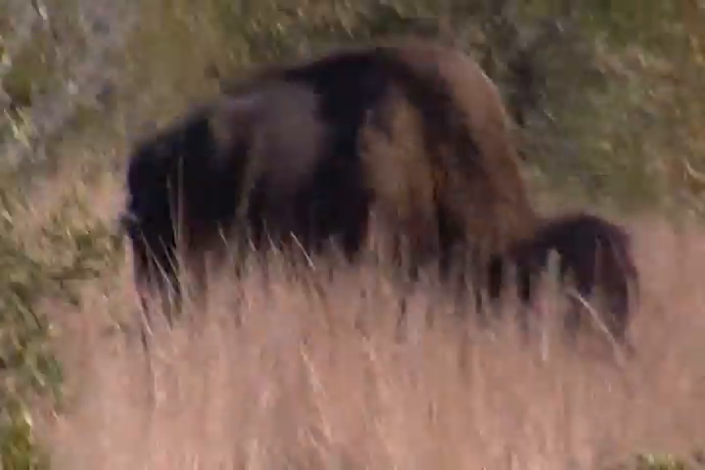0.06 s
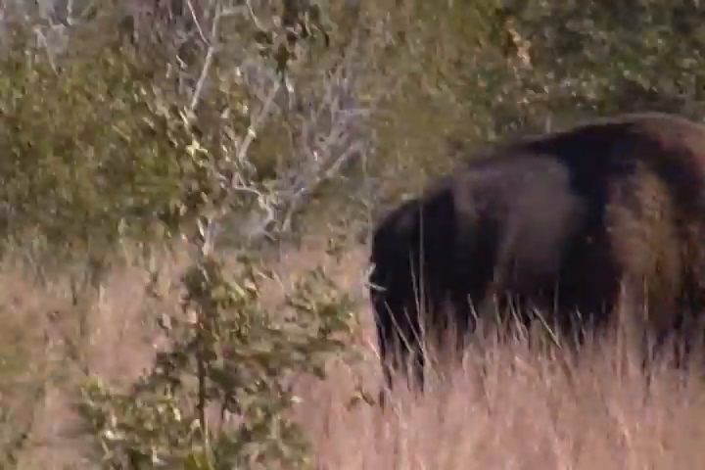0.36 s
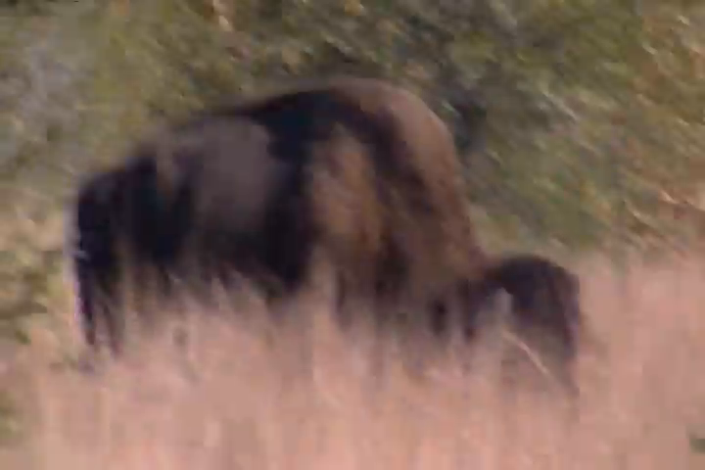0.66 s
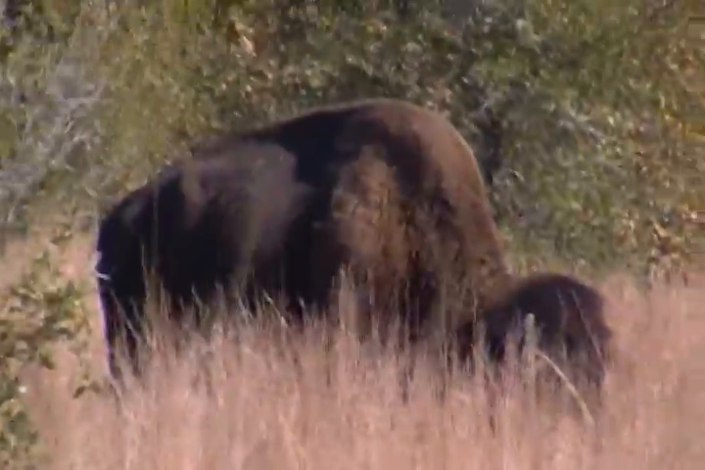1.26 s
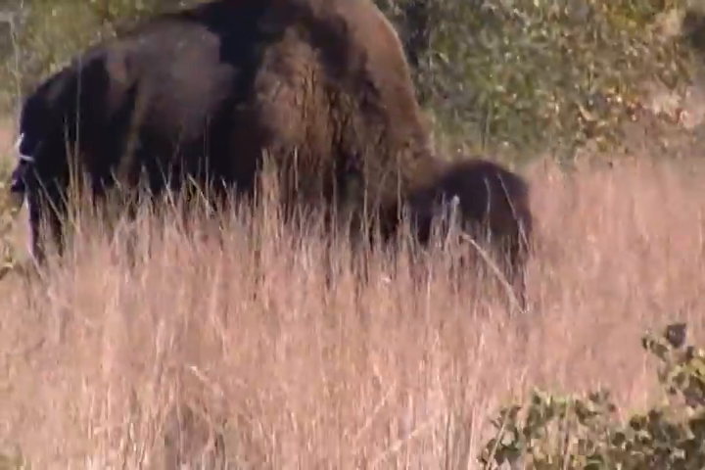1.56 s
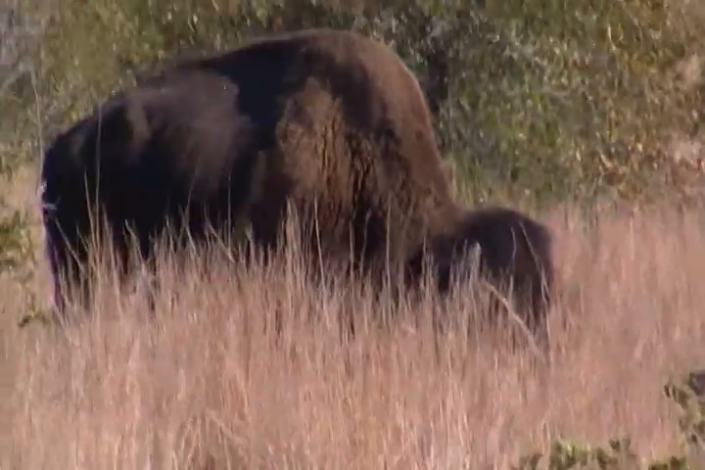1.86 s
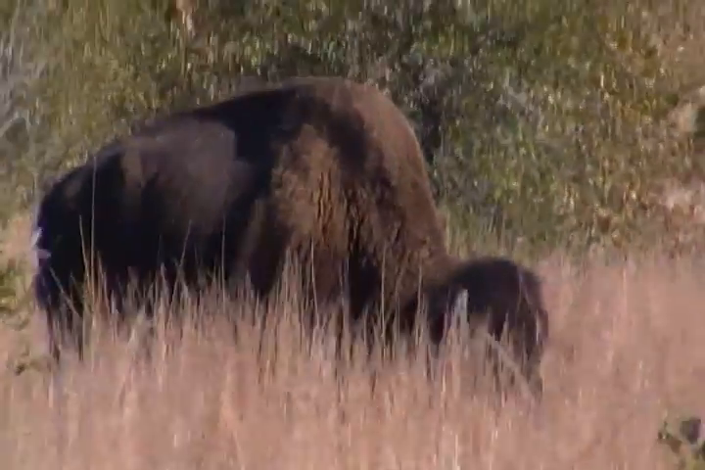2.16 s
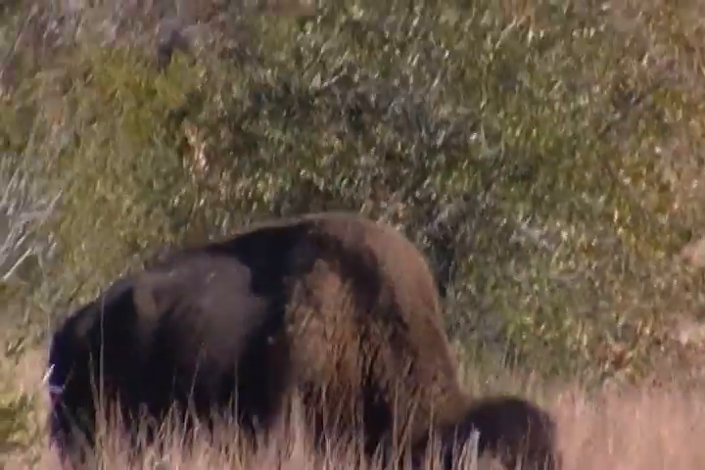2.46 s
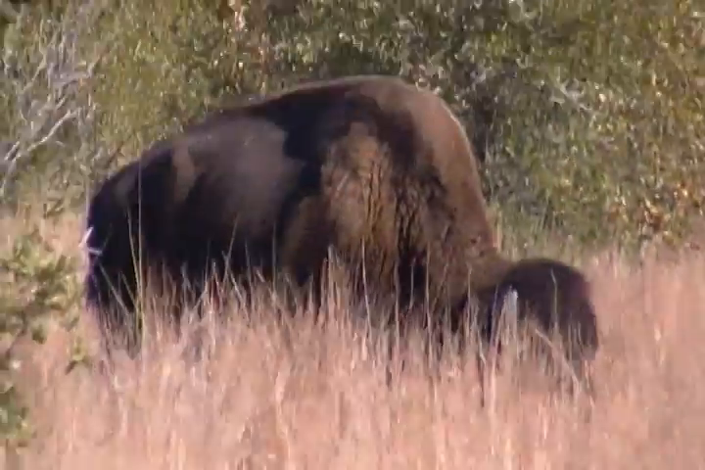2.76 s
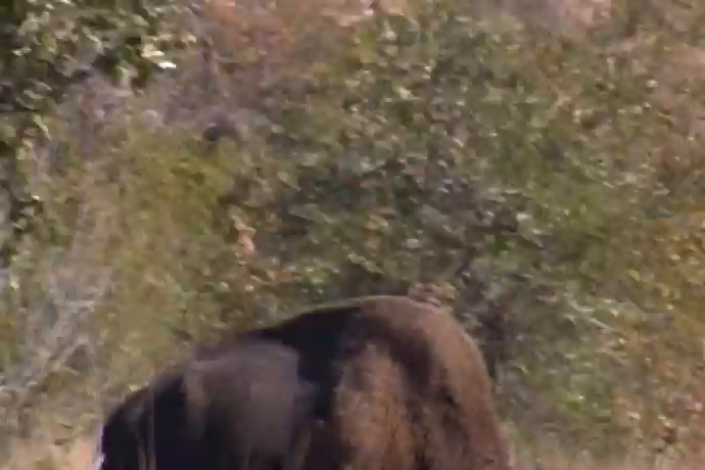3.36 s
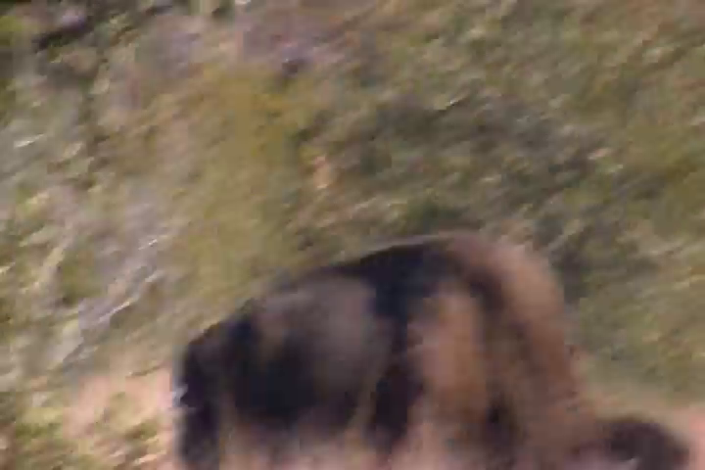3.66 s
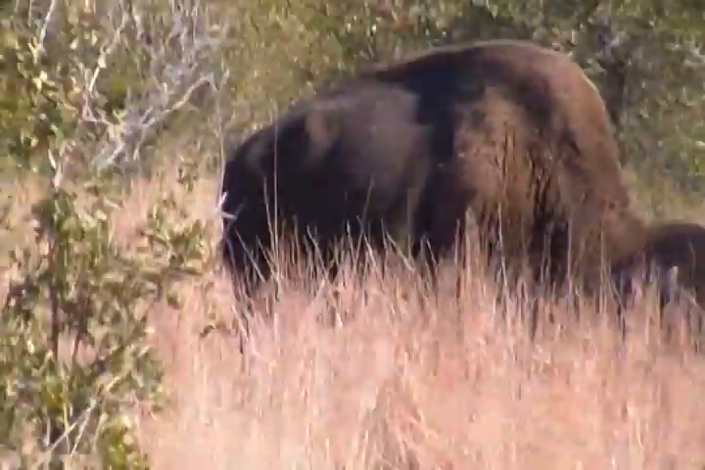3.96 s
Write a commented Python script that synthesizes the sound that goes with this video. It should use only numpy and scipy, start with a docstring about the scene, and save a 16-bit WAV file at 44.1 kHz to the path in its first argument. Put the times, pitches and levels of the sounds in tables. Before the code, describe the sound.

Wind rumbles on a handheld microphone outdoors, over a deep idling engine throb and a soft rush with faint hiss. Light finger rubs and plastic clicks come around 0.6 to 0.9 seconds, then a louder knock and a gust thump near 1.5. From 2 seconds the wind buffets harder, thumping and crackling until the end, with more scattered handling clicks and a sharp one near 3.75.

```python
"""A grassy field, at a handheld camera, with a low throb like a vehicle idling close by.
A soft rush fades under a fine hiss while wind eddies buffet the two microphone ports
and crackle on the peaks. Fingers rub the camera; its plastic shell rings in clicks,
its grip in dull knocks."""
import sys
import numpy as np
from scipy import signal
from scipy.fft import rfft, irfft
from scipy.io import wavfile
from scipy.ndimage import uniform_filter1d

SR = 44100
rng = np.random.default_rng(int(sys.argv[2]) if len(sys.argv) > 2 else 0)


def master_out(mix):
    """Clip the mix to full scale and print it as 16-bit PCM to the path in sys.argv[1]."""
    frames = np.transpose(np.atleast_2d(mix))
    ceiling = np.clip(frames, -1, 1)
    pcm = np.round(ceiling * 32767).astype(np.int16)
    wavfile.write(sys.argv[1], SR, pcm)


N = 176400
T = np.arange(N) / SR


def amp(db):
    """dB to gain."""
    return 10 ** (np.asarray(db) / 20)


def unit(x):
    """Scale to rms 1."""
    return x / np.sqrt(np.mean(x ** 2) + 1e-20)


def at_hz(points, hz):
    """Interpolate a table over log frequency."""
    f, value = np.transpose(points)
    return np.interp(np.log(hz + 1), np.log(f + 1), value)


def curve(points, t, column=1):
    """Interpolate a table column over time."""
    rows = np.array(points)
    return np.interp(t, rows[:, 0], rows[:, column])


def pan(side_db):
    """Port gains for a left-minus-right level."""
    return unit(amp([[side_db / 2], [-side_db / 2]]))


def add(mix, start_s, sound):
    """Mix in at start_s."""
    part = mix[:, max(round(start_s * SR), 0):][:, :sound.shape[-1]]
    part += sound[..., :part.shape[1]]


def drift(hz):
    """Random wander up to about hz, rms 1."""
    f = np.fft.rfftfreq(N, 1 / SR)
    return unit(irfft(rfft(rng.standard_normal(N)) * np.exp(-(f / hz) ** 2) * (f > 0), N))


def swells(rows):
    """Envelope of Gaussian bumps."""
    return sum(amp(db) * np.exp(-((T - s) / half_width_s) ** 2) for s, half_width_s, db in rows)


def noise(spectrum, correlation, patchy_db=0, stretch=None, size=1024):
    """Two-port noise, rms 1, with drifting spectral patches; stretch(t) scales frequency."""
    hop = size // 4
    t, hz = np.arange(N // hop + 5) * hop / SR, np.fft.rfftfreq(size, 1 / SR)
    a, b, c, d, patches = rng.standard_normal((5, len(t), len(hz)))
    patches = unit(uniform_filter1d(uniform_filter1d(patches, size=10, axis=0), size=14, axis=1))
    k = np.clip(at_hz(correlation, hz) if np.ndim(correlation) else correlation, -1, 1)
    left = a + 1j * b
    right = k * left + np.sqrt(1 - k ** 2) * (c + 1j * d)
    shape_db = at_hz(spectrum, hz / stretch(t)[:, None] if stretch else hz)
    frames = np.array([left, right]) * amp(shape_db + patchy_db * patches)
    return unit(signal.istft(frames.swapaxes(1, 2), nperseg=size, noverlap=size - hop)[1][:, :N])


def engine():
    """A slow idle throbs in its lowest orders, the deepest furthest right."""
    # (order [x idle rate], level [dB])
    orders = [(1, -17), (2, -24), (3, -33.5), (4, -32.5), (5, -27.5), (6, -30), (9, -37.5)]
    idle_hz = 23.866
    turns = np.cumsum(idle_hz * (1 + 0.006 * drift(3.4))) / SR
    out = np.zeros((2, N))
    for order, db in orders:
        tone = np.sin(2 * np.pi * (order * turns + rng.random()))
        flutter = 1 + min(0.13 * order, 0.55) * drift(6.9)
        side_db = -7.5 * min(1, 34.8 / (order * idle_hz))
        out += amp(db) * tone * flutter * pan(side_db)
    return np.sqrt(2) * out


def whines():
    """Thin, slightly wavering tones of engine and camera."""
    # (frequency [Hz], level [dB], pitch waver [fraction])
    tones = [(350.4, -41.5, 0.0031), (359.2, -42.5, 0.0035), (429.7, -43.5, 0.0021), (829, -52, 0.0029),
             (4500, -80, 0.0045), (7881, -66, 0.00036)]
    out = np.zeros(N)
    for hz, db, waver in tones:
        cycles = np.cumsum(hz * (1 + waver * drift(6.3))) / SR
        out += amp(db) * np.sin(2 * np.pi * cycles) * (1 + 0.26 * drift(24))
    return np.sqrt(2) * out


def rush():
    """A soft, broad rush fades and partly returns."""
    # (frequency [Hz], relative density [dB])
    spectrum = [(25, -7), (70, 3), (130, 0.5), (210, 2), (300, -4.5), (560, -12.5), (900, -9.5),
                (1400, -15.5), (2200, -24.5), (4000, -32), (8000, -39), (13000, -58)]
    # between ports (frequency [Hz], correlation [0..1])
    correlation = [(40, 0.05), (130, 0.88), (270, 1), (600, 0.97), (1300, 0.89), (2700, 0.72), (6000, 0)]
    # (time [s], level [dB])
    levels = [(0, -22), (.5, -23.5), (1.1, -23.5), (1.7, -23.5), (2.1, -26.5), (2.5, -31), (3.05, -37),
              (3.5, -34.5), (3.85, -27.5), (4, -31)]
    return noise(spectrum, correlation, patchy_db=1.03) * amp(curve(levels, T) + 0.61 * drift(46))


def hiss():
    """A fine hiss rises and falls gently."""
    # (frequency [Hz], relative density [dB])
    spectrum = [(300, 10), (1500, 5), (3300, 1), (4200, -2.5), (5000, -4), (6500, -4), (9000, -8.5),
                (12000, -13.5)]
    # between ports (frequency [Hz], correlation [-1..1])
    correlation = [(1500, 0.52), (4000, 0.48), (5800, -0.04), (7500, -0.58), (12000, -.15)]
    # (time [s], level [dB])
    levels = [(0, -46), (.4, -39), (.65, -39.5), (1.15, -42.5), (1.45, -36.5), (1.9, -42), (2.45, -39.5),
              (2.6, -39), (3.05, -42), (3.45, -40.5), (4, -39.5)]
    return noise(spectrum, correlation, patchy_db=2) * amp(curve(levels, T))


def wind():
    """Eddies hit each port separately; faster air reaches higher frequencies."""
    # at stretch 1 (frequency [Hz], relative density [dB])
    spectrum = [(8, 1.5), (25, -7.5), (60, 0.5), (120, -2), (180, -6), (260, -14), (400, -26), (700, -34.5),
                (2000, -50.5), (8000, -80)]
    # (time [s], level [dB], spectral stretch [ratio])
    gusts = [(0, -21, 0.38), (.32, -17.5, 0.56), (.6, -35, 0.4), (1.33, -25, 0.5), (1.46, -12.5, 0.6),
             (1.6, -26, 0.73), (1.85, -22, 0.54), (2.03, -13, 0.63), (2.21, -15.5, 0.94), (2.31, -14, 0.75),
             (2.42, -17, 1.05), (2.66, -9.5, 0.68), (2.78, -12.5, 1.05), (2.92, -13, 1.04),
             (3.12, -14, 0.9), (3.22, -16, 1.02), (3.34, -12.5, 0.94), (3.49, -14.5, 1.03),
             (3.53, -20.5, 1.08), (3.62, -13.5, 1.06), (3.73, -16.5, 0.82), (3.84, -14, 0.81),
             (4, -17, 0.8)]
    eddies = noise(spectrum, correlation=-0.019, stretch=lambda t: curve(gusts, t, column=2), size=4096)
    flutter_db = 1.43 * np.array([drift(6.7), drift(12)])
    return eddies * amp(curve(gusts, T) + flutter_db)


def rubs_and_knock_tail():
    """Short grainy swells: finger rubs, and the loudest knock's brief noisy tail at 1.449 s."""
    # (centre [s], half-width [s], level [dB])
    bursts = [(0.638, 0.041, -31), (0.77, 0.026, -30.5), (0.85, 0.023, -32), (1.335, 0.017, -28.5),
              (1.423, 0.012, -29.5), (1.449, 0.011, -26), (1.513, 0.013, -25.5), (1.658, 0.015, -30),
              (1.829, 0.013, -30.5), (2.03, 0.028, -28), (2.27, 0.011, -33), (2.31, 0.0069, -31),
              (2.456, 0.0086, -30), (2.73, 0.018, -39), (2.894, 0.0091, -38), (3.305, 0.023, -33.5),
              (3.454, 0.042, -34.5), (3.718, 0.018, -34)]
    # (frequency [Hz], relative density [dB])
    spectrum = [(100, -20), (450, 16.5), (1000, 9), (2000, 1), (3500, -5), (6000, -7.5), (9000, -24),
                (13000, -32)]
    rustle = noise(spectrum, correlation=1, patchy_db=2)
    grain_db = 7.5 * np.tanh(drift(hz=700))
    return swells(bursts) * unit(rustle * amp(grain_db))


def sizzle():
    """Wind and fingers make clusters of fine crackle."""
    # (centre [s], half-width [s], relative level [dB])
    clusters = [(0.636, 0.035, -45), (2.026, 0.02, -40), (2.073, 0.043, -44), (2.294, 0.051, -53),
                (2.478, 0.027, -45), (2.74, 0.06, -43), (2.898, 0.027, -43), (3.308, 0.02, -40),
                (3.473, 0.039, -38), (3.637, .015, -41), (3.816, .025, -42)]
    # (frequency [Hz], relative density [dB])
    spectrum = [(300, 3.5), (2000, 2), (6000, -5), (9000, -2.5), (12000, -5.5)]
    fizz = noise(spectrum, correlation=0.1)
    grain_db = 7.2 * np.tanh([drift(hz=400), drift(hz=400)])
    return amp(-1) * swells(clusters) * unit(fizz * amp(grain_db))


def clicks():
    """An impulse and a brief rattle ring the shell; the grip detunes each click a little."""
    # (time [s], low-mode drive [dB], mid-mode drive [dB], high-mode drive [dB], left-right [dB])
    hits = [(0.8312, -32, -19, -20, 0), (0.8559, -29, -13, -17, 0), (0.8972, -34, -13.5, -14, -1),
            (0.911, -36, -21, -29, 0), (1.3887, -32, -16, -18, 0), (1.4264, -30, -32, -9.5, -1),
            (1.4385, -11.5, -8.5, -10, 2), (1.441, -19, -33, -7, 4), (1.5117, -31, -18, -15.5, -1),
            (2.0242, -18, -11.5, -25, -1), (2.0305, -15, -13.5, -22, 0), (2.0414, -18, -11, -28, 0),
            (2.2722, -18, -10, -27, 2), (2.303, -30, -7, -22, 9), (2.4478, -23, -7.5, -16, 5),
            (2.481, -40, -24, -17.5, 10), (2.732, -34, -26, -12.5, 9), (2.837, -37, -34, -12, 9),
            (3.4465, -21, -11.5, -18, 1), (3.478, -24, -16, -16, 13), (3.679, -41, -40, -19.5, 6),
            (3.7079, -25, -13, -24, 4), (3.711, -30, -20, -26, 4), (3.7523, -6, -30, 1, 5.5),
            (3.7576, -27, -35, -22, 2), (3.8213, -26, -16, -30, 0)]
    # (frequency [Hz], gain [dB], t60 [s], group [0 low, 1 mid, 2 high])
    shell_modes = [(780, 5, 0.0085, 0), (950, 3, 0.012, 0), (1270, 4, 0.0035, 1), (1656, 4, 0.0058, 1),
                   (2200, -2, 0.0049, 1), (3060, -1.5, 0.0021, 2), (3650, -5.5, 0.0048, 2),
                   (5070, -7, 0.0041, 2), (6740, -9, 0.0026, 2), (8900, -12.5, 0.0013, 2)]
    gain_db, rattle_db, rattle_s, detune = -2.5, -4, 0.005, 0.016
    out, t = np.zeros((2, N)), np.arange(SR // 12) / SR
    for s, *drive_db, side_db in hits:
        ring = np.zeros(len(t))
        for i, (hz, db, t60_s, group) in enumerate(shell_modes):
            detuned_hz = hz * (1 + detune * rng.standard_normal())
            envelope = amp(drive_db[group] + db - 60 * t / t60_s)
            ring += (-1) ** i * envelope * np.sin(2 * np.pi * detuned_hz * t)
        force = rng.standard_normal((2, len(t))) * np.exp(-t / rattle_s)
        force *= amp(rattle_db) / np.linalg.norm(force[0])
        force[:, 0] += 1  # impulse
        add(out, s, amp(gain_db) * signal.fftconvolve(force, ring[None], axes=1) * pan(side_db))
    return out


def knocks():
    """Dull knocks ring the grip; higher ones die sooner."""
    # (time [s], level [dB], pitch [ratio], left-right [dB])
    hits = [(1.332, -21, 1.9, 1), (1.439, -10, 1.1, 0.5), (1.511, -14, 0.95, 0), (2.030, -17.5, 0.92, 0),
            (2.787, -20, 1.3, 19), (2.902, -22.5, 1.32, 9), (3.248, -20.5, 1.72, -11),
            (3.5275, -16.5, 1.22, 13)]
    # at pitch 1 (frequency [Hz], gain [dB], t60 [s])
    grip_modes = [(420, -1.5, 0.038), (470, -1, 0.029), (606, -11, 0.0061)]
    out, t = np.zeros((2, N)), np.arange(SR // 12) / SR
    for s, level_db, pitch, side_db in hits:
        ring = sum(amp(level_db + db - 60 * t * pitch / t60_s) * np.sin(2 * np.pi * hz * pitch * t)
                   for hz, db, t60_s in grip_modes)
        add(out, s, ring * pan(side_db))
    return out


def buffets():
    """Single strong eddies thump the ports."""
    # (centre [s], level [dB], frequency [Hz], left-right [dB])
    eddies = [(1.483, -3, 44.6, -13), (2.056, -8, 132, -17), (2.12, -11.5, 171, 11), (2.326, -9.5, 182, 12),
              (2.559, -14.5, 218, -5), (2.66, -10, 229, 11), (2.675, -4, 55, -1), (2.709, -17.5, 333, -3),
              (2.765, -13.5, 270, 18), (2.795, -12.5, 262, 15), (2.821, -12.5, 202, 0),
              (2.905, -10, 250, 5), (2.945, -15.5, 220, -10), (3.016, -8, 189, -1), (3.101, -5, 93, -1),
              (3.151, -8.5, 173, 16), (3.348, -6.5, 86.6, -14), (3.38, -12.5, 185, 12), (3.456, -7, 65, 1),
              (3.481, -1.5, 75.5, 2), (3.502, -9.5, 117, 24), (3.635, -12.5, 196, 7)]
    half_width_s = 0.0077
    out, t = np.zeros((2, N)), np.arange(-SR // 20, SR // 20) / SR
    for s, db, hz, side_db in eddies:
        thump = np.exp(-(t / half_width_s) ** 2) * np.sin(2 * np.pi * (hz * t + rng.random()))
        add(out, s + t[0], amp(db) * thump * pan(side_db))
    return out


def crackle():
    """Sharp spits in the strongest wind: each a snap with a brief ragged tail."""
    # (time [s], relative level [dB], left-right [dB])
    spits = [(2.0615, -37, 6), (2.1148, -32, -15), (2.233, -30, -9), (2.2819, -28.5, -5), (2.3153, -29, 15),
             (2.335, -39, 12), (2.345, -26.5, 25), (2.466, -37, 6), (2.5078, -31, -5), (2.692, -32.5, -10),
             (2.7078, -32.5, -5), (2.7407, -33, 11), (2.746, -29.5, 13), (2.808, -31, 15),
             (2.8365, -33.5, 16), (2.8528, -30, 21), (2.902, -26.5, -18), (2.9044, -32, -7),
             (2.9076, -29, 8), (2.9227, -30, 21), (3.013, -31.5, 17), (3.023, -35, 4), (3.0955, -30, 18),
             (3.1033, -30.5, 10), (3.1775, -32, -9), (3.3233, -28, 15.5), (3.3489, -29, 3.5),
             (3.376, -29.5, 12), (3.4555, -35, -1.5), (3.484, -31, -17), (3.4925, -29, 16),
             (3.508, -30, 21), (3.6512, -28.5, 19), (3.737, -27.5, 16), (3.9648, -28, -16)]
    # (frequency [Hz], gain [dB])
    colour = [(200, 10), (1000, 1.5), (3000, -10.5), (6500, -23.5), (9000, -16.5), (12000, -16)]
    gain_db, tail_db, tail_s = 32, -7, 0.00095
    out, t = np.zeros((2, N)), np.arange(SR // 100) / SR
    for s, db, side_db in spits:
        spit = rng.standard_normal(len(t)) * np.exp(-t / tail_s) * (t > 0)
        spit *= amp(tail_db) / np.linalg.norm(spit)
        spit[0] = 1  # snap
        add(out, s, amp(db + gain_db) * spit * pan(side_db))
    return irfft(rfft(out) * amp(at_hz(colour, np.fft.rfftfreq(N, 1 / SR))), N)


def scene():
    """All sources at the ports; the right lags one sample."""
    field = engine() + whines() + rush() + hiss() + wind() + buffets() + crackle()
    left, right = field + sizzle() + clicks() + knocks() + rubs_and_knock_tail()
    return np.array([left, np.append(0, right[:-1])])


def record(dry):
    """Soft clip near full scale, then low-pass."""
    cutoff_hz = 12400
    clipped = dry / (1 + dry ** 8) ** (1 / 8)
    lowpass = signal.firwin(161, cutoff_hz, window=("kaiser", 9), fs=SR)
    return signal.oaconvolve(clipped, lowpass[None], "same")


dry = scene()
out = record(dry)
master_out(out)
```